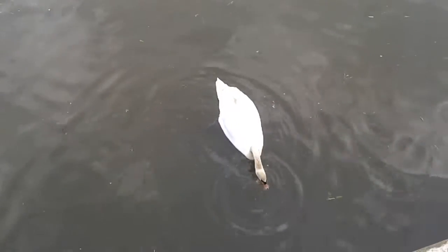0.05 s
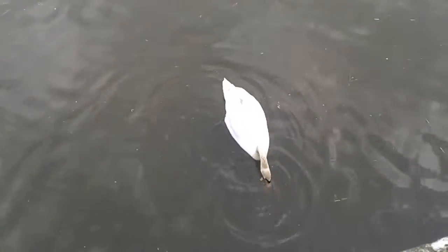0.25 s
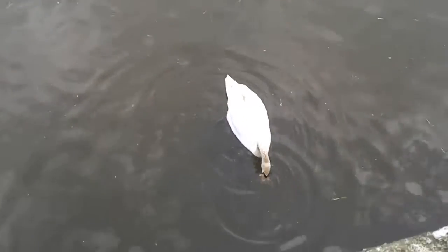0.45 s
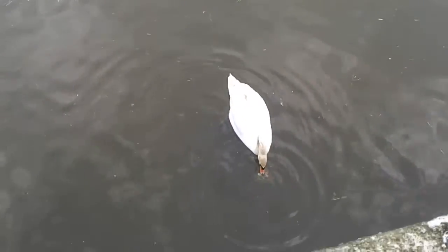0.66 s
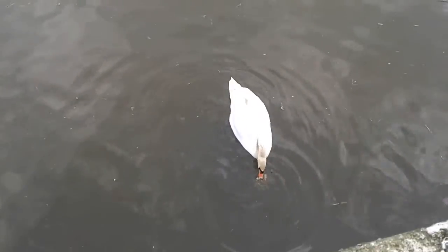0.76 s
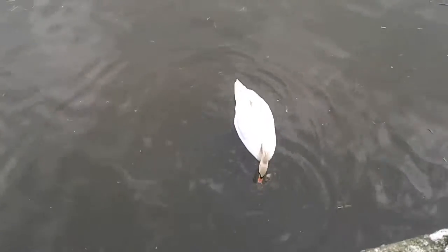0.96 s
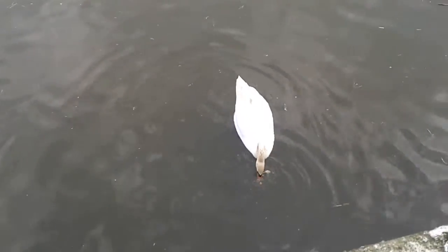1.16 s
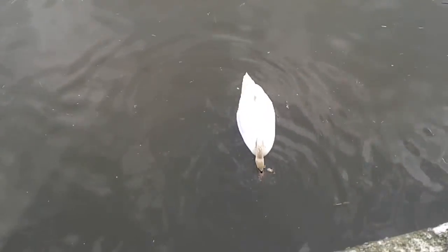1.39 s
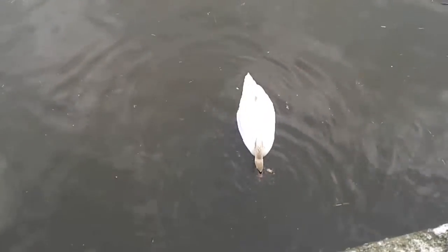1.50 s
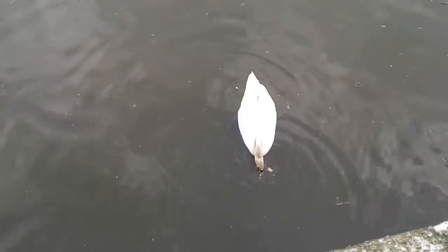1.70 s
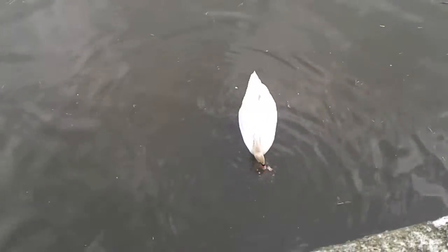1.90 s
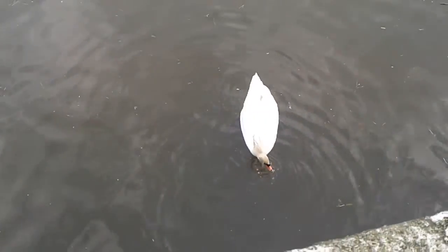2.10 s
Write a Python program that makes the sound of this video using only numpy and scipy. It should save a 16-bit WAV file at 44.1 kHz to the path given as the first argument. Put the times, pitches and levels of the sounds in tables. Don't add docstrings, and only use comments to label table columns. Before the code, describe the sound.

Swan huffs, airy and hollow with a slight whistle: one fading at the start, two soft ones near 0.8-1.2 seconds, a short louder snort around 1.4 and a dark puff at 1.7. Small wet bill clicks include a sharp snap at 1.3. Faint birds whistle, falling nearer at 0.6-0.85, then blur into chorus. Wind thumps the microphone, strongest after 1.85, over soft river hush.

```python
import sys
import numpy as np
from scipy import signal
from scipy.fft import rfft, irfft, next_fast_len
from scipy.io import wavfile
from scipy.ndimage import uniform_filter1d, map_coordinates

SR = 44100
rng = np.random.default_rng(int(sys.argv[2]) if len(sys.argv) > 2 else 0)


def generate_wav(signal):
    frames = np.transpose(np.atleast_2d(signal))
    scaled = np.clip(frames, -1, 1) * 32767
    pcm = np.round(scaled).astype(np.int16)
    wavfile.write(sys.argv[1], SR, pcm)


def boost_factor(decibels):
    exponent = np.asarray(decibels, float) / 20
    return 10 ** exponent


N = 94682


def unit(x):
    return x / np.sqrt(np.mean(x ** 2) + 1e-20)


def clock():
    return np.arange(N) / SR


def wobble(rate):
    return map_coordinates(rng.standard_normal(int(N * rate / SR) + 4), [clock() * rate])


def smooth_step(x):
    return 0.5 + 0.5 * np.tanh(x)


def filtered(x, response):
    m = next_fast_len(N + SR // 2)
    return irfft(rfft(x, m) * response(np.fft.rfftfreq(m, 1 / SR)), m)[..., :N]


def resonant(peaks):
    def response(f):
        total = 0
        for k, (hz, width, db) in enumerate(peaks):
            total = total + (-1) ** k * boost_factor(db) * 1j * f * width / (hz * hz - f * f + 1j * f * width)
        return total
    return response


def breath(peaks, top_hz):
    def response(f):
        low_cut = f ** 4 / (f ** 4 + (0.27 * peaks[0][0]) ** 4)
        high_cut = 1 / (1 + (f / top_hz) ** 12)
        return resonant(peaks)(f) * low_cut * high_cut
    return unit(filtered(rng.standard_normal(N), response))


def hush():
    # frequency in Hz, level in dB per Hz.
    hush_spectrum = [(24, -30), (40, 3), (101, 1), (174, -2), (1570, -16.5), (2580, -23.5), (3570, -24),
                     (4360, -24.5), (15600, -41.5)]
    # time in seconds, level in dB.
    hush_level = [(0.0, -64), (0.55, -63.5), (2.15, -62)]
    z = signal.stft(rng.standard_normal(N), nperseg=512)[2]
    patches = uniform_filter1d(rng.standard_normal(z.shape), 6, 0)
    patches = uniform_filter1d(patches, 10, 1)
    noise = signal.istft(z * boost_factor(2.97 * unit(patches)), nperseg=512)[1][:N]
    f, db = np.transpose(hush_spectrum)
    river = filtered(noise, lambda hz: boost_factor(np.interp(np.log(hz + 1), np.log(f), db)))
    river = river / np.std(filtered(river, lambda hz: (hz > 1500) & (hz < 5000)))
    swell_db = np.interp(clock(), *np.transpose(hush_level))
    mic_hiss = boost_factor(-70) * rng.standard_normal(N)
    return boost_factor(-5 + swell_db) * river + mic_hiss


def huffs():
    # start and end in seconds, level in dB, brightness in dB, fade of the hiss in seconds.
    huff_table = [
        (-.09, 0.055, -50.5, 3.5, 0.0086),
        (0.806, 0.965, -52, 3.5, 0.021),
        (1.028, 1.193, -51, 1, 0.014),
        (1.357, 1.447, -43, -1, 0.003),
        (1.669, 1.778, -44, -10.5, .007),
    ]
    # frequency in Hz, width in Hz, level in dB.
    windpipe = [(730, 41, 2), (1125, 63, -0.5), (1442, 79, -2), (1950, 140, -2), (2403, 170, -6),
                (3010, 440, -13), (3470, 74, -10.5)]
    # gain in dB at 750, 1300, 1950 and 2400 Hz.
    tilts = [(6, 2, 2, 4.5), (5, -1, 0.5, 2.5), (5.5, 4.5, -5.5, -0.5), (4, 11.5, 8, 3), (7, 11.5, 2, 1)]
    # frequency in Hz, width in Hz, level in dB.
    nostril = [(3960, 640, -5.5), (4750, 190, 2), (5500, 590, 0), (6500, 500, 6), (7200, 1850, -0.5)]
    # frequency in Hz, level in dB, top of the huff's hiss in Hz.
    leads = [(2020, -3, 6000), (2350, -10.5, 7000), (2290, -13.5, 5400), (1840, -6, 8000), (1950, -6, 7600)]
    attack_s, release_s = 0.036, 0.008
    opens = 0.43
    body_shut_db, hiss_shut_db = -8, -16
    hiss_db, flutter_db = -7.5, 1
    t, out = clock(), np.zeros(N)
    for (a, b, db, bright_db, fade_s), tilt, (lead_hz, lead_db, top_hz) in zip(huff_table, tilts, leads):
        gate = smooth_step((t - a) / attack_s) * smooth_step((b - t) / release_s) * boost_factor(db)
        shut = 1 - smooth_step((t - a - opens * (b - a)) / (1.6 * fade_s))
        mode_db = np.interp([hz for hz, _, _ in windpipe], [750, 1300, 1950, 2400], tilt)
        modes = [(hz, width, d + extra) for (hz, width, d), extra in zip(windpipe, mode_db)]
        body = breath(modes, top_hz) * boost_factor(body_shut_db * shut + flutter_db * wobble(90))
        hiss = breath(nostril, top_hz)
        hiss = hiss * boost_factor(hiss_db + bright_db + hiss_shut_db * shut + flutter_db * wobble(48.7))
        hiss = hiss * smooth_step((b - fade_s - t) / fade_s)
        lead = boost_factor(lead_db) * breath([(lead_hz, 118, 0)], top_hz)
        out += gate * (body + hiss + lead)
    return out


def swirls(s, size, hz):
    suck, tip, tail = 0.2, 1.0, 1.6
    k = np.arange(-800, 800)
    start = np.round(s * SR).astype(int)
    u = 2 * np.pi * hz[:, None] * k / SR
    rows = size[:, None] * 3 * (u - suck) * np.exp(-0.7 * (u ** 2 + tip) ** (tail / 2))
    places = start[:, None] + k + 800
    return np.bincount(places.ravel(), rows.ravel(), N + 1600 + SR)[800:N + 800]


def wind():
    # time in seconds, peak in dB,
    # size as a frequency in Hz.
    eddies = [(0.0589, -25, 196), (0.0645, -33, 111), (0.0689, -23.5, 240), (0.0752, -30, 90),
              (0.0799, -30, 219), (0.1029, -37.5, 90), (0.4158, -33.5, 111), (0.4227, -28.5, 111),
              (0.5074, -34.5, 91), (0.5993, -32, 210), (0.6042, -31.5, 89), (0.6111, -22, 142),
              (0.6154, -32, 89), (0.6244, -27, 170), (0.786, -24.0, 210), (0.8814, -35.5, 138),
              (0.8866, -27.5, 184), (0.893, -32, 135), (1.0733, -34, 160), (1.0895, -35.5, 140),
              (1.0984, -30, 179), (1.1029, -24, 238), (1.1072, -32.5, 125), (1.113, -32.0, 125),
              (1.1579, -36, 90), (1.2118, -33.5, 143), (1.2195, -34.5, 114), (1.2275, -36.5, 162),
              (1.2381, -35, 127), (1.2507, -33, 126), (1.3125, -27.5, 90), (1.3185, -23.0, 174),
              (1.3239, -31, 204), (1.4035, -24, 195), (1.6334, -31.5, 99), (1.6399, -34.5, 120),
              (1.8295, -36, 90), (1.8383, -24.5, 90), (1.8516, -32, 208), (1.8559, -39, 142),
              (1.8631, -23.5, 93), (1.87, -18, 137), (1.8775, -20, 231), (1.8818, -31, 89),
              (1.8944, -28, 112), (1.9971, -33, 100), (2.0072, -25, 165), (2.0176, -35, 90),
              (2.0322, -23, 197), (2.0365, -34, 181), (2.0422, -23.5, 90), (2.0508, -23, 199),
              (2.0568, -20, 270), (2.0613, -19.5, 206), (2.0656, -23, 90), (2.0721, -15.5, 278),
              (2.0769, -31, 179), (2.0846, -32.5, 90), (2.1224, -21.5, 277), (2.1405, -34, 90),
              (.018, -37.5, 70), (.04, -37.5, 70), (0.0658, -31.5, 248), (0.4278, -34.5, 348),
              (0.517, -36, 134), (.5975, -39, 468), (.6215, -29.5, 200), (0.7857, -43, 420),
              (0.8917, -29.5, 440), (1.0944, -34, 222), (1.2545, -34.5, 226), (1.2722, -37.5, 200),
              (1.3155, -20.5, 460), (1.335, -37, 226), (1.358, -34, 380), (1.362, -33, 204),
              (1.3994, -29.5, 203), (1.4015, -33, 400), (1.836, -30.5, 226), (1.8555, -30, 323),
              (1.8606, -23.5, 202), (1.8731, -31.5, 198), (1.8788, -34, 364), (2.0302, -28, 360),
              (2.0409, -22, 193), (2.0558, -20.5, 410), (2.065, -24, 330), (2.071, -23, 414),
              (2.146, -28, 266)]
    # centre in seconds, width in seconds, level in dB.
    puffs = [(.02, 0.042, -52), (0.08, 0.023, -42), (.36, 0.009, -55.5), (0.52, 0.019, -46.5),
             (0.61, 0.014, -38.5), (0.674, 0.0088, -49), (0.777, 0.025, -49), (1.001, 0.02, -49.5),
             (1.045, 0.005, -42.5), (1.15, 0.029, -46), (1.19, 0.0049, -48), (1.26, 0.043, -40.5),
             (1.35, 0.018, -44), (1.43, 0.045, -48), (1.53, 0.021, -54), (1.634, 0.037, -49.5),
             (1.776, 0.0077, -43.5), (1.858, 0.025, -37.5), (1.92, 0.014, -51), (2.01, 0.034, -44.5),
             (2.057, 0.016, -31.5), (2.1, 0.05, -39.5),]
    rate, count = 125, 600
    port_hz, port_damping = 84.3, 1.36
    s, db, hz = np.transpose(eddies)
    strong = swirls(s, boost_factor(db), hz)

    draw = rng.standard_normal((count, 3))
    when = (np.arange(count) + 0.5 + 0.3 * draw[:, 0]).clip(0) / rate
    keep = when < N / SR
    power = boost_factor(-63.5) ** 2
    for centre, width, puff_db in puffs:
        power = power + boost_factor(puff_db) ** 2 * np.exp(-((when - centre) / width) ** 2)
    scatter = boost_factor(4.5 + 3 * draw[:, 1].clip(-2, 1.5))
    sign = np.sign(1 + rng.standard_normal(count))
    small_hz = 138 * np.exp(0.56 * draw[:, 2].clip(-2, 1.5))
    small = swirls(when * keep, keep * np.sqrt(power) * scatter * sign, small_hz)

    def port(f):
        return -f * f / (port_hz ** 2 - f * f + 1j * f * port_hz * port_damping)
    return filtered(strong + small, port)


def whistle(a, b, hz, db):
    edge_s = 0.006
    t = clock()
    gate = smooth_step((t - a) / edge_s) * smooth_step((b - t) / edge_s)
    rasp = boost_factor(db + 3 * wobble(220))
    phase = 2 * np.pi * np.cumsum(hz * (1 + 0.0055 * wobble(150))) / SR
    return rasp * gate * np.sin(phase)


def birds():
    # start and end in seconds, first and last pitch in Hz, level in dB.
    whistles = [(.078, 0.15, 3930, 3880, -68), (0.145, 0.175, 3800, 3180, -58.5),
                (.168, 0.189, 3500, 3250, -59.5), (0.184, 0.224, 3000, 2960, -76),
                (0.216, 0.243, 3420, 3180, -61), (0.194, 0.25, 3600, 3505, -66.5),
                (.25, 0.294, 3080, 2730, -67), (0.268, 0.315, 3660, 3650, -63.5),
                (0.321, 0.347, 3400, 2680, -64.5), (.355, 0.489, 3634, 3600, -70),
                (0.36, 0.573, 4240, 4180, -67.5), (0.598, 0.68, 4140, 4130, -76),
                (0.433, 0.445, 3400, 3485, -57.5), (0.411, 0.484, 2340, 2547, -68.5),
                (0.628, 0.667, 5940, 5840, -66.5), (0.891, 0.973, 6330, 6500, -73),
                (0.992, 1.05, 7520, 7500, -76), (1.001, 1.04, 6220, 6130, -71),
                (1.186, 1.225, 4110, 4180, -71), (1.23, 1.266, 3880, 3750, -68),
                (1.32, 1.342, 6120, 6600, -64), (1.345, 1.353, 6300, 6650, -61),
                (1.613, 1.714, 5220, 5000, -67), (1.747, 1.78, 5250, 5240, -64),
                (1.778, 1.83, 6880, 6800, -69), (1.837, 1.935, 6620, 6500, -68),
                (1.955, 2.024, 5040, 4650, -73), (1.975, 2.146, 2720, 2700, -73.5),
                (2.006, 2.063, 2620, 2400, -65)]
    # time in seconds, pitch in Hz.
    falls = [
        [(.565, 7000), (.595, 6020), (.63, 5680), (.658, 5200)],
        [(.645, 7220), (.682, 5900), (.727, 5580)],
        [(.752, 6800), (.775, 6200), (.83, 5500), (.86, 4750)],
    ]
    falls_db = [-61.5, -65, -58.5]
    # start and end in seconds, pitch in Hz, width in Hz, level in dB.
    chorus = [
        (1.17, 1.52, 5500, 890, -69),
        (1.24, 1.693, 2320, 150, -73),
        (1.617, 1.994, 3360, 437, -70.5),
        (1.81, 2.2, 1950, 310, -66),
        (1.967, 2.205, 2350, 403, -67.5),
        (2.06, 2.12, 5450, 900, -71.5),
    ]
    t, out = clock(), np.zeros(N)
    for a, b, hz0, hz1, db in whistles:
        left = 1 - ((t - a) / (b - a)).clip(0, 1)
        out += whistle(a, b, hz1 + (hz0 - hz1) * left ** 1.6, db)
    for path, db in zip(falls, falls_db):
        a, b = path[0][0], path[-1][0]
        fade = np.abs(2 * (t - a) / (b - a) - 0.8).clip(0, 2) ** 2
        out += whistle(a, b, np.interp(t, *np.transpose(path)), db - 6 * fade)
    for a, b, hz, width, db in chorus:
        gate = smooth_step((t - a) / 0.021) * smooth_step((b - t) / 0.067)
        out += gate * boost_factor(db + 0.86 * wobble(25)) * breath([(hz, width, 0)], hz + 2 * width)
    return out


def bill():
    # time in seconds, peak in dB, ring in Hz, share of crack.
    clicks = [
        (.312, -47.5, 1465, 0.45),
        (0.645, -48, 1530, .2),
        (.81, -43, 1770, .1),
        (1.0656, -43, 5640, .2),
        (1.207, -49.5, 6000, .2),
        (1.3398, -34, 5350, 0.78),
        (1.445, -42, 5640, 0.55),
        (1.926, -51, 5050, .9),
        (.123, -50, 6000, .3),
    ]
    ring_cycles, crack_s, onset_s = 10, 0.0008, 0.00014
    out, t = np.zeros(N + SR), np.arange(SR // 50) / SR
    for s, db, hz, share in clicks:
        crack = share * rng.standard_normal(len(t)) * np.exp(-t / crack_s)
        tones = sum(np.sin(2 * np.pi * hz * ratio * t) for ratio in (0.93, 1.06))
        ring = tones * 0.5 * np.exp(-t * hz / ring_cycles)
        out[round(s * SR):][:len(t)] += boost_factor(db) * (ring + crack) * (1 - np.exp(-t / onset_s))
    return filtered(out[:N], lambda f: f ** 2 / (f ** 2 + 1200 ** 2) / (1 + (f / 12500) ** 8))


def banks(x):
    t = np.arange(SR // 2) / SR
    tail = rng.standard_normal(len(t)) * boost_factor(-60 * t / 0.22)
    return signal.fftconvolve(x, tail / np.linalg.norm(tail))[:N]


def scene():
    song, swan = birds(), huffs() + bill()
    near = swan + boost_factor(-18.5) * banks(swan)
    far = song + boost_factor(-5.5) * banks(song)
    return (near + far + wind() + hush())[None]


def top_cut(x):
    return signal.sosfilt(signal.butter(12, 15715, fs=SR, output="sos"), x)


def record(dry):
    ceiling, top_hz = 0.19, 15719
    soft = dry / (1 + np.abs(dry / ceiling) ** 4) ** 0.25
    return top_cut(filtered(soft, lambda hz: hz < top_hz))


dry = scene()
out = record(dry)
generate_wav(out)
```